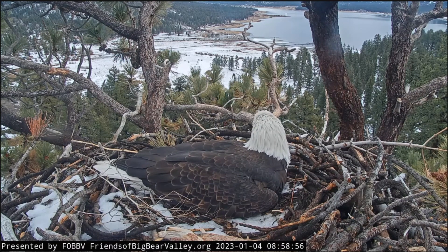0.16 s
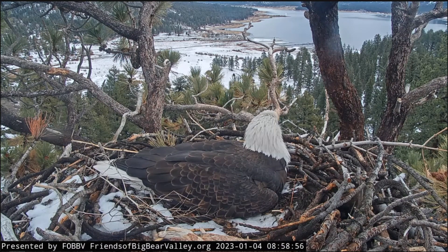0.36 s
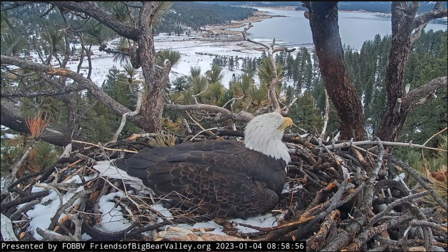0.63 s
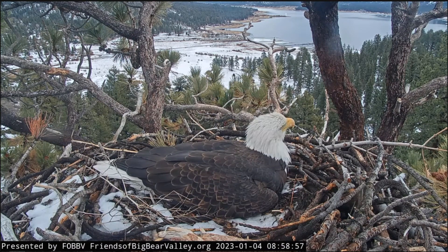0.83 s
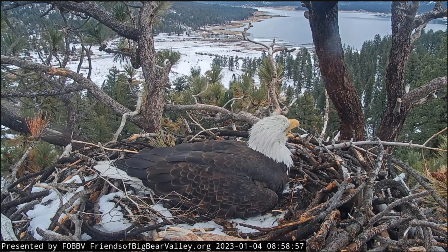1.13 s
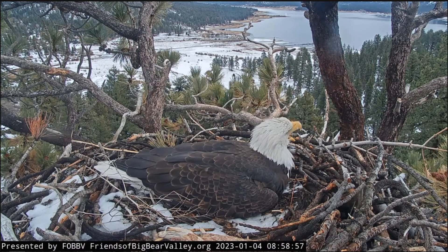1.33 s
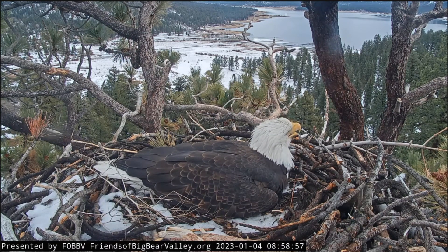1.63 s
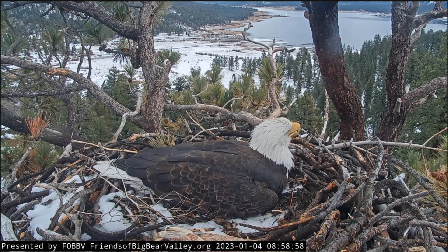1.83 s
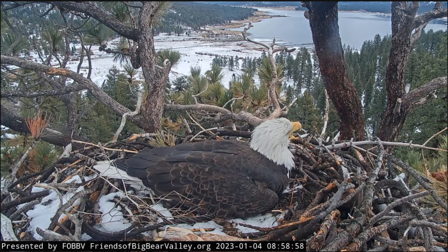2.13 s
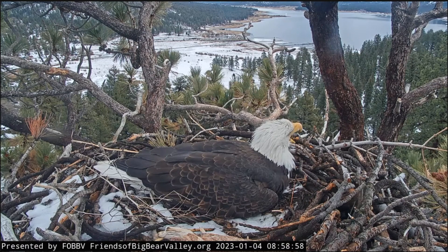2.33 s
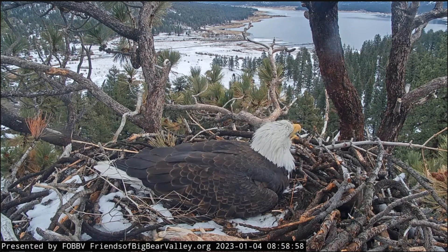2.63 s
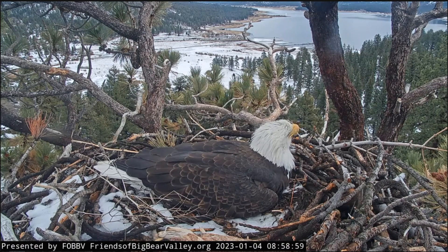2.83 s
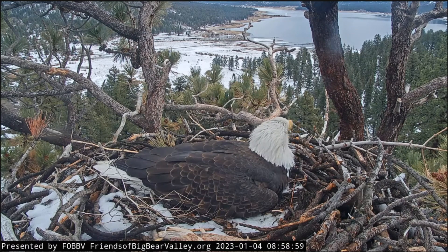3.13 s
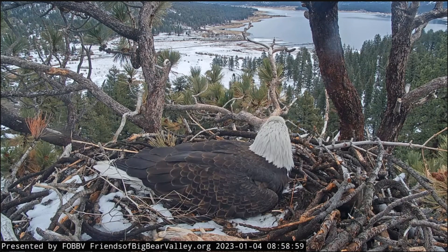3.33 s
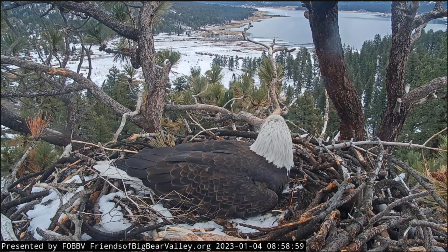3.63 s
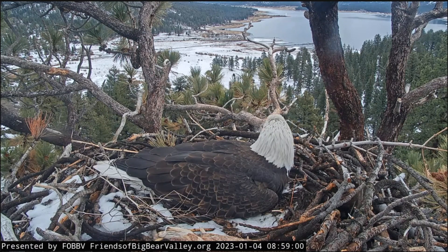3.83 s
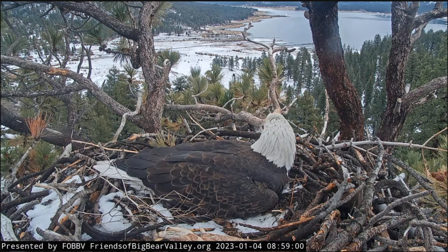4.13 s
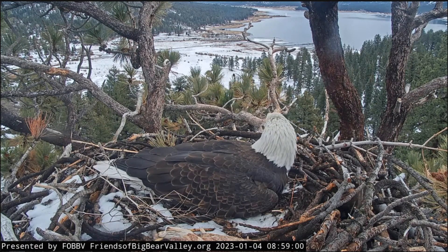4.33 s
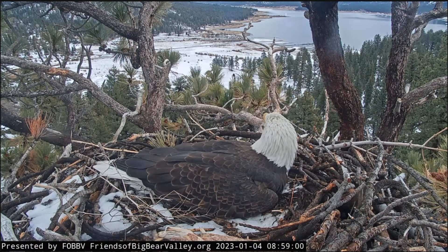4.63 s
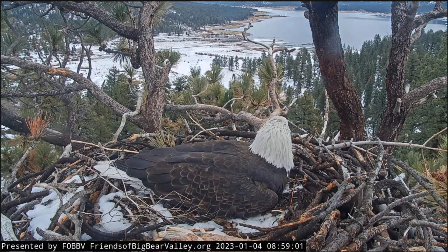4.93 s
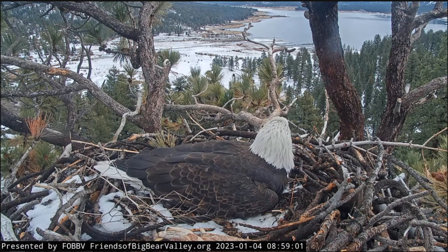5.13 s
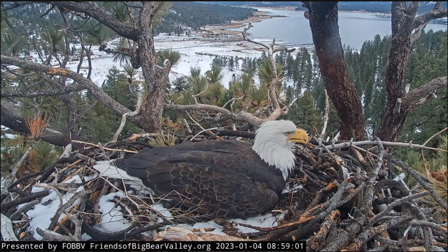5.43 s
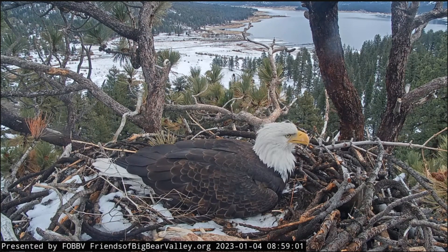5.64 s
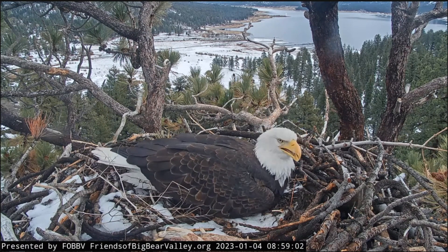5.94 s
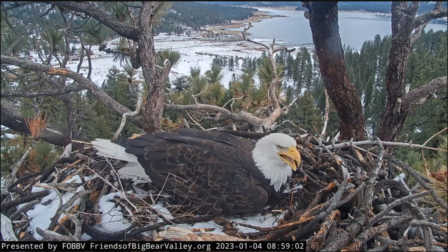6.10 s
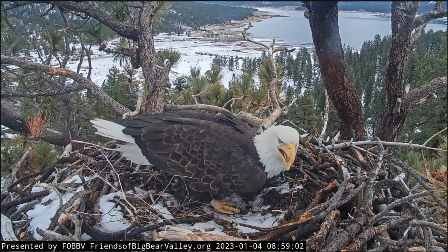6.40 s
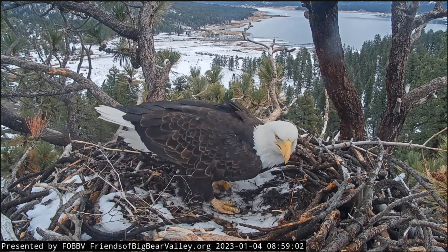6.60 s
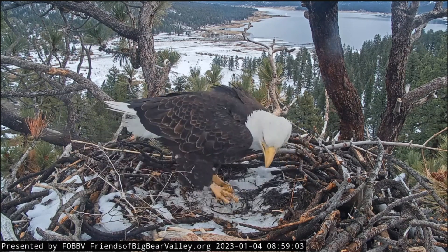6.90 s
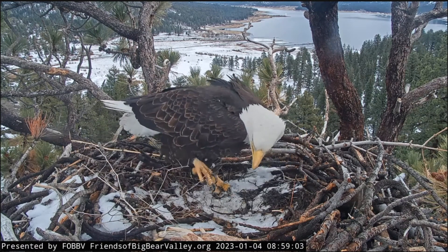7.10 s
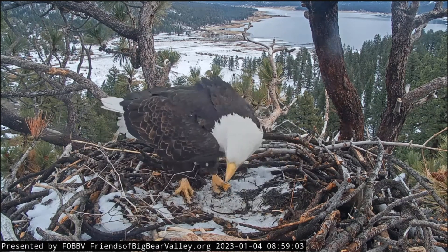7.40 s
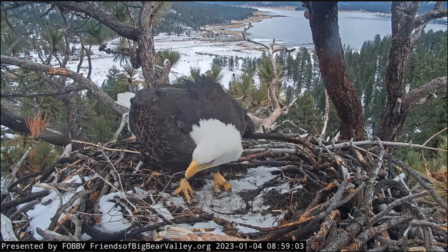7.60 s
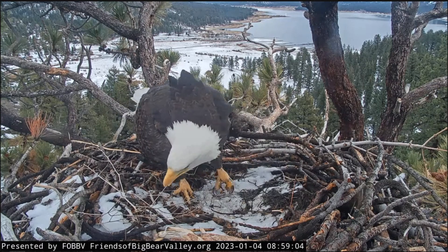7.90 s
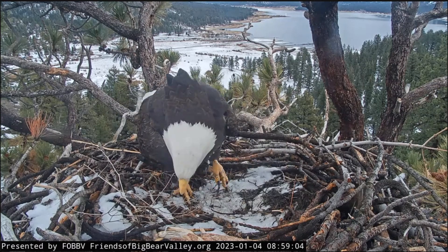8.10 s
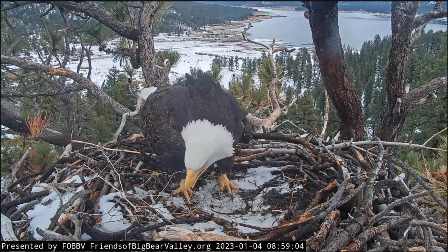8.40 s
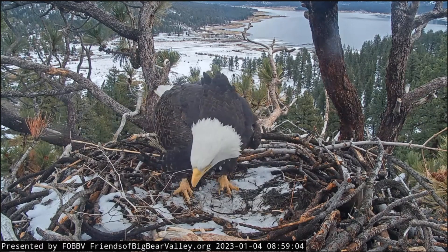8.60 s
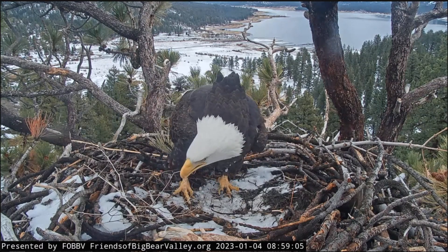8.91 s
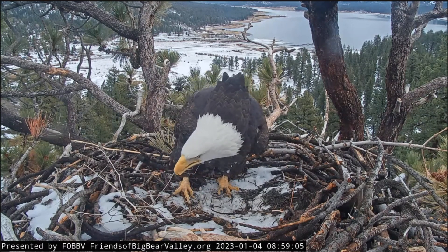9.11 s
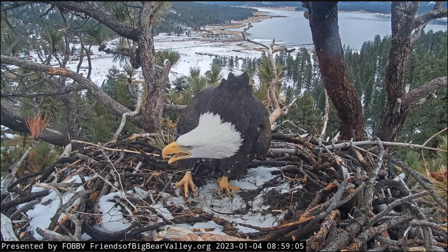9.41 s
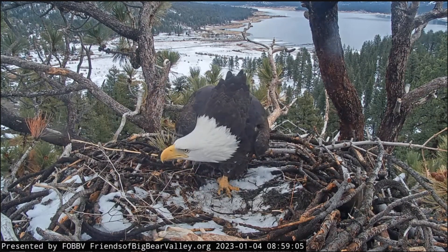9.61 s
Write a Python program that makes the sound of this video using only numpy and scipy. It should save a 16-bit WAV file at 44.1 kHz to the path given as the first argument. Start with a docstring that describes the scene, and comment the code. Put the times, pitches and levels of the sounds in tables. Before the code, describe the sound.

A bald eagle close by gives two long, rising, slightly raspy squeals, pauses, then gives five more over a low rumble and soft hiss.

```python
"""A low rumble and a soft hiss run throughout. After a second, a bald eagle on its nest gives two long,
rising squeals; the background dips under the second, with a dull bump. After a pause come five more,
while twigs tick. Trees faintly echo each one. The first, fifth and last jump from a low voice to a high
one. The bird's voice box (syrinx) has two sides; when both vibrate at once, the squeal turns raspy."""
import sys
import numpy as np
from scipy import signal
from scipy.fft import rfft, irfft, next_fast_len
from scipy.io import wavfile
from scipy.ndimage import map_coordinates

SR = 44100
rng = np.random.default_rng(int(sys.argv[2]) if len(sys.argv) > 2 else 0)


def generate_wav(signal):
    """Clip the signal to [-1, 1] and save it as 16-bit WAV at the path in sys.argv[1]."""
    frames = np.transpose(np.atleast_2d(signal))
    scaled = np.clip(frames, -1, 1) * 32767
    pcm = np.round(scaled).astype(np.int16)
    wavfile.write(sys.argv[1], SR, pcm)


N = 429975

# One row per note; a squeal that jumps up is a low note running straight into a high one.
# first_hz, last_hz, arch_hz, fall_s, opening_rasp (0-1), shrill_from_db (effort that turns it shrill),
# then added to the effort: ends_db, middle_db (both for harmonic 1), beside_db (see harmonic_levels)
NOTE_SHAPES = [ (1053.5, 1151, 2, 0, 0.29, -17.5, -8.5, -16, -5),
               (1630.4, 1703, 0.5, .036, 0.11, -18.5, -13, -14, -15.5),
               (1644.6, 1799, 11.5, .04, 0.9, -18.5, -6.5, -15, -15),
               (1533, 1694, 23.5, .025, .03, -18.5, -5.5, -12, -10),
               (1530, 1722, 33.5, .042, 0.85, -19, -3.5, -7.5, -9.5),
               (1119.7, 1260, 3.5, 0.0025, 0.087, -22, -7.5, -1.5, -7.5),
               (1780, 1830, 10.5, .055, 0.3, -17, -10.5, -19, -12.5),
               (1138.6, 1265, 44, 0.053, 0.051, -20, -6, -6, -3.5),
               (1118.5, 1191, -21.5, 0.0045, 0.16, -19, -9.5, -5, -4),
               (1714, 1702, -41, .069, 0.3, -19, -6.5, -4.5, -19.5), ]
# How hard the bird pushes, and the level of the harmonic its throat boosts.
# One list per note, from start to end: time_s, effort_db, throat_db
NOTE_EFFORTS = [
    [(1.005, -28.5, -43), (1.017, -26, -34), (1.099, -17.5, -22), (1.119, -21, -35), (1.145, -14.5, -19.5),
     (1.211, -22.5, -31), (1.225, -20.5, -15)],
    [(1.218, -19, -25), (1.234, -14.5, -15), (1.424, -13, -14), (1.456, -13.5, -15), (1.476, -32.5, -37.5)],
    [(2.13, -22, -27), (2.164, -15, -16.5), (2.4, -12.5, -13), (2.524, -13.5, -13.5), (2.59, -8, -16),
     (2.602, -16, -23.5), (2.614, -7.5, -15.5), (2.652, -12.5, -14.5), (2.668, -31.5, -33)],
    [(4.752, -31, -29), (4.782, -27.5, -24), (4.878, -25.5, -20.5), (4.964, -27.5, -39.5),
     (5.02, -23, -21.5), (5.128, -24, -26), (5.17, -19.5, -20), (5.318, -13.5, -17), (5.338, -37.5, -33)],
    [(5.872, -21.5, -37), (5.882, -23.5, -28.5), (5.95, -21, -22.5), (6.022, -17.5, -32.5),
     (6.08, -15.5, -22), (6.116, -17, -28), (6.178, -13, -16), (6.554, -12, -14.5), (6.575, -32, -33)],
    [(6.935, -21.5, -28.5), (6.949, -17, -17), (6.999, -17.5, -27), (7.101, -17.5, -15), (7.149, -18, -24),
     (7.301, -18.5, -25.5), (7.349, -17.5, -15.5), (7.451, -16.5, -22.5), (7.474, -14, -17)],
    [(7.472, -12, -18.5), (7.486, -11, -11), (7.518, -10.5, -13), (7.543, -21.5, -32.5)],
    [(7.927, -23, -33.5), (7.961, -20, -20.5), (8.115, -20, -26), (8.191, -17.5, -19.5), (8.367, -14, -32),
     (8.449, -15.5, -25.5), (8.497, -15, -27), (8.519, -16.5, -20), (8.542, -31, -37)],
    [(8.974, -24.5, -42), (8.984, -18, -28), (9.066, -22.5, -37), (9.152, -23, -28.5),
     (9.262, -19.5, -29.5), (9.342, -21.5, -36.5), (9.41, -18, -19), (9.436, -34, -30.5)],
    [(9.43, -25.5, -24.5), (9.462, -15.5, -18.5), (9.504, -15, -20), (9.572, -17, -19), (9.598, -30, -39)],
]


def amp(db):
    """Turn decibels into a gain."""
    return 10 ** (np.asarray(db) / 20)


def along(points, hz):
    """Read a curve of (hz, value) points, joined on a log frequency axis."""
    freqs, values = np.transpose(points)
    return np.interp(np.log(hz + 1), np.log(freqs), values)


def wobble(rate, size):
    """A smooth random curve through `rate` new values a second."""
    values = rng.standard_normal(int(size * rate / SR) + 4)
    return map_coordinates(values, [np.arange(size) * rate / SR])


def filtered(x, response):
    """Scale each frequency in x by response(hz)."""
    padded = next_fast_len(len(x) + 8192)
    return irfft(rfft(x, padded) * response(np.fft.rfftfreq(padded, 1 / SR)), padded)[:len(x)]


def noise(spectrum, size):
    """Noise shaped by (freq_hz, level_db) points, then scaled to an average (rms) size of 1."""
    x = filtered(rng.standard_normal(size), lambda hz: amp(along(spectrum, hz)))
    return x / np.sqrt(np.mean(x ** 2) + 1e-20)


def add(track, start_s, sound):
    """Mix a sound into the track."""
    part = track[round(start_s * SR):][:len(sound)]
    part += sound[:len(part)]


def gate(t, start, end, ramp):
    """1 between start and end, with soft edges centred on them."""
    return np.sin(np.pi / 2 * np.clip(np.minimum(t - start, end - t) / ramp + .5, 0, 1)) ** 2


def arch(progress):
    """0 at both ends of a note and 1 in its middle."""
    return 4 * progress * (1 - progress)


def background():
    """A steady low rumble and soft hiss, with one dull bump."""
    # Tone of the rumble and of the hiss: freq_hz, level_db
    rumble_tone = [(12, -50.5), (20, -11.5), (48, -3.5), (65, 0.5), (123, -7), (229, -18.5), (279, -20),
                   (381, -24), (503, -23.5), (1000, -27), (1300, -59), (2200, -120)]
    hiss_tone = [(590, -29), (1000, -8), (1480, -5), (2190, -9), (2400, -6), (2850, -5.5), (3580, 0.5),
                 (5360, -14.5), (5810, -19), (6980, -22), (13000, -36), (14600, -38.5), (15600, -66.5)]
    # Both dip briefly under the second squeal: time_s, gain_db
    dip = [(2.25, 0), (2.4, -5.5), (2.5, -8.5), (2.6, 0.5)]
    t = np.arange(N) / SR
    rumble = amp(-42 + .7 * wobble(3.265, N)) * noise(rumble_tone, N)
    hiss = amp(-46 + .9 * wobble(.87, N)) * noise(hiss_tone, N)
    bump = amp(-29) * gate(t, 2.61, 2.665, .024)
    bump *= noise([(15, -11), (35, 2), (90, -8), (250, -30), (1000, -91)], N)
    return (rumble + hiss) * amp(np.interp(t, *np.transpose(dip))) + bump


def twigs():
    """Twigs in the nest tick: dry bursts of noise that fade 60 dB in 21 ms."""
    # One row per tick: start_s, relative_level_db
    ticks = [(4.5687, -50), (5.4456, -49), (5.6574, -42), (8.9536, -47), (9.2799, -33)]
    tone = [(500, -15), (3000, 17.5), (12000, -8), (15500, -13.5)]
    track, t = np.zeros(N), np.arange(SR // 20) / SR
    for start_s, level_db in ticks:
        add(track, start_s, amp(level_db + 4 - 60 * t / .021) * noise(tone, len(t)))
    return track


def forest_echo(voice, delay_s=.17, build_s=.12):
    """The wooded slope scatters back a late, dull echo that builds up and dies away."""
    # How long each frequency takes to fade by 60 dB: freq_hz, fade_s
    fade_times = [(500, 0.28), (3400, 1), (12000, 0.1)]
    hz, t, spectrum = signal.stft(rng.standard_normal(SR), SR, nperseg=256)
    fade = amp(-60 * t / along(fade_times, hz)[:, None])
    tail = signal.istft(spectrum * fade, SR, nperseg=256)[1]
    tail *= np.minimum(np.arange(len(tail)) / SR / build_s, 1)
    echo = np.zeros(N)
    add(echo, delay_s, signal.fftconvolve(voice, tail / np.linalg.norm(tail)))
    tone = [(1700, -5.5), (3500, -1.5), (6000, -21), (12000, -29)]
    return filtered(echo, lambda hz: amp(along(tone, hz)))


def trunk_echoes(voice):
    """Trunks around the nest bounce back quick, weak copies that beat with the falling note ends."""
    echoes = np.zeros(N)
    for delay_s, db in [(.009, -29.5), (.017, -25)]:
        add(echoes, delay_s, amp(db) * voice)
    return filtered(echoes, lambda hz: amp(along([(4000, 4.5), (12000, -7.5)], hz)))


def hoarseness(t, lead_s=.014, hold_s=.028):
    """How much the other side of the voice box joins in: as each note opens, and in uneven patches."""
    # Hoarse stretches inside the notes: start_s, end_s, relative_depth (0-1)
    stretches = [(5.218, 5.314, 0.02), (7.192, 7.225, .13), (7.272, 7.3, .15), (7.311, 7.47, .04),
                 (8.03, 8.248, .055), (8.27, 8.505, 0.02), (9.252, 9.336, 0.04), (9.464, 9.545, 0.36)]
    starts = [effort[0][0] for effort in NOTE_EFFORTS]
    openings = sum(depth * gate(t, start - lead_s, start + hold_s, .014)
                   for (_, _, _, _, depth, *_), start in zip(NOTE_SHAPES, starts))
    patches = sum(depth * gate(t, start, end, .022) for start, end, depth in stretches)
    return openings + patches * amp(3.5 * wobble(37.4, len(t)))


def breath(shrill_db, rasp):
    """Air rushes through the open beak, louder when the voice is shrill or raspy."""
    # Tone of the rushing air: freq_hz, level_db
    air_tone = [(300, -42.5), (900, -24.5), (2200, -12.5), (3200, -28.5), (5000, -1), (8500, 1.5),
                (13000, -4.5), (15500, -36)]
    return amp(shrill_db - 26) * (1 + 2 * rasp) * noise(air_tone, len(rasp))


def growl(level_db, rasp):
    """Uneven vibration makes the throat ring with a narrow band of noise."""
    throat_tone = [(2200, -39), (2800, -16.5), (3000, -3.5), (3400, -1.5), (4200, -10), (5200, -30)]
    return amp(level_db) * np.clip(rasp + .069, 0, .25) * noise(throat_tone, len(rasp))


def glide(age, progress, first_hz, last_hz, arch_hz, scoop, settle_s=.07, swing_hz=13.5):
    """A note's curved pitch path; with a scoop it starts too low, overshoots and settles."""
    path_hz = first_hz + (last_hz - first_hz) * progress + arch_hz * arch(progress)
    return path_hz * (1 - scoop * np.exp(-(age / settle_s) ** 2) * np.cos(2 * np.pi * swing_hz * age))


def harmonic_levels(effort_db, throat_db, colour, low, progress, falling, unsteady):
    """Levels of harmonics 1-3 and of the shrill overtones, which flare up when the bird pushes hard."""
    shrill_from_db, ends_db, middle_db, beside_db = colour
    size = len(progress)
    late_arch = arch(progress ** 1.4)  # peaks after the middle of the note
    first = effort_db + ends_db + (middle_db - ends_db) * late_arch + .3 * wobble(8.2, size)
    beside = effort_db + beside_db + .3 * wobble(8.2, size)
    trembling_db = effort_db + .73 * wobble(80, size)
    forced = np.clip((trembling_db - shrill_from_db) / 6, 0, 1)  # 0 soft, 1 forced
    shrill = effort_db - 26.5 + 22 * forced - 5 * falling
    # the throat boosts harmonic 3 of a low note and 2 of a high one; the other lies beside it
    second, third = (beside, throat_db) if low else (throat_db, beside)
    return [db + 2.5 * unsteady * wobble(90, size) for db in (first, second, third, shrill)]


def overtones(t, phase, pitch, shrill_db, shrill_tone, top_harmonic, converter_hz=32000):
    """The shrill harmonics from the fourth up; they grow duller as the effort drops."""
    k = np.arange(4, top_harmonic + 1)[:, None]
    hz = k * pitch
    db_per_octave = np.minimum(shrill_db + 16.5, 0)
    flutter_db = np.array([.65 * wobble(9.88, len(t)) + 1.6 * wobble(70, len(t)) for _ in k])
    gains = amp(along(shrill_tone, hz) + db_per_octave * np.log2(k) + flutter_db)
    treble = hz.mean(axis=1) > 5300
    gains /= np.linalg.norm(gains[treble], axis=0)
    # overtones above half the digital converter's rate fold back down and glide the opposite way
    angle = np.where(hz > converter_hz / 2, 2 * np.pi * converter_hz * t - k * phase, k * phase)
    return amp(shrill_db) * np.sum(gains * np.sin(angle), axis=0)


def two_sides(pitch, rasp, other_ratio, other_drift, pull, chaos):
    """The two sides of the voice box beat together, shaking the wave's phase and level into a rasp."""
    size = len(pitch)
    phase = 2 * np.pi * np.cumsum(pitch) / SR
    other_hz = pitch * other_ratio * (1 + other_drift * wobble(400, size))
    other = 2 * np.pi * np.cumsum(other_hz) / SR
    beat = other - phase
    shake = pull * (np.sin(beat) - .24 * np.sin(other)) + chaos * wobble(1300, size)
    swell = 1 + rasp * (.43 * np.cos(beat) + .22 * np.cos(other))
    return phase + rasp * shake, swell


def squeal_note(note, effort, scoop, low, shrill_tone, top_harmonic, growl_db, shimmer_db, **sides):
    """The voice box whistles one gliding note, with breath and growl. Returns start time and sound."""
    first_hz, last_hz, arch_hz, fall_s, _, *colour = note
    times, *levels = np.transpose(effort)
    start, end = times[0], times[-1]
    t = np.arange(start - .01, end + .01, 1 / SR)
    size = len(t)
    age, left = t - start, np.maximum(end - t, 0)
    progress = np.clip(age / (end - start), 0, 1)
    falling = (np.maximum(fall_s - left, 0) / (fall_s + 1e-9)) ** 2  # rises to 1 as the note ends
    pitch = glide(age, progress, first_hz, last_hz, arch_hz, scoop) * (1 - .15 * falling)
    unsteady = np.exp(-np.minimum(age, left) / .11)  # while the voice settles, and as it tires
    effort_db, throat_db = [np.interp(t, times, db) for db in levels]
    *main_db, shrill_db = harmonic_levels(effort_db, throat_db, colour, low, progress, falling, unsteady)
    # as the air pressure gives out, the voice cracks: pitch and level shake for the last 25 ms
    gives_out = fall_s > .005  # a note that jumps up keeps its pressure
    crack = gives_out * np.clip(1 - left / .025, 0, 1)
    pitch *= 1 + (.001 + .0075 * crack) * wobble(140, size) + .0021 * wobble(900, size)
    rasp = hoarseness(t) + .36 * crack ** 2
    phase, swell = two_sides(pitch, rasp, **sides)
    swell *= amp((shimmer_db + 3.3 * crack) * wobble(129.9, size))
    # the three lowest harmonics carry the note; a weak one flickers more than a strong one
    flicker_db = np.clip(.071 * (-23 - np.array(main_db)), .2, 2)
    body = sum(amp(db + depth * wobble(70, size)) * np.sin(k * phase)
               for k, (db, depth) in enumerate(zip(main_db, flicker_db), 1))
    shrill = overtones(t, phase, pitch, shrill_db, shrill_tone, top_harmonic)
    whistle = np.sqrt(2) * swell * (body + shrill)
    sound = whistle + breath(shrill_db, rasp) + growl(np.max(main_db, axis=0) + growl_db, rasp)
    return t[0], sound * gate(t, start, end, ramp=.015)


def eagle(high_from_hz=1400, grunt_lead_s=.027):
    """The eagle calls in its low and high voice; each squeal opens with a soft grunt and a scoop."""
    # Tone of the shrill overtones at full effort, for each voice: freq_hz, level_db
    low_tone = [(4800, -2), (6300, 7), (7500, 6.5), (8800, 6.5), (10200, 2), (12600, -1), (14000, -8.5),
                (15400, -26)]
    high_tone = [(6700, -7), (8500, 1.5), (10400, -0.5), (12000, -7), (13700, -13), (15400, -30),
                 (19000, -28.5), (22000, -26.5), (27000, -39.5)]
    low_voice = dict(shrill_tone=low_tone, top_harmonic=12, growl_db=-7, shimmer_db=-.1,
                     other_ratio=1.47, other_drift=.025, pull=.96, chaos=.14)
    high_voice = dict(shrill_tone=high_tone, top_harmonic=16, growl_db=-21, shimmer_db=.4,
                      other_ratio=.688, other_drift=.003, pull=.61, chaos=.05)
    track, t = np.zeros(N), np.arange(SR // 25) / SR
    grunt = np.hanning(len(t)) * np.sin(2 * np.pi * (430 + 1200 * t) * t)
    last_end = 0
    for note, effort in zip(NOTE_SHAPES, NOTE_EFFORTS):
        start, first_db, _ = effort[0]
        from_silence = start - last_end > .1
        scoop = .021 * from_silence  # share of the pitch
        low = note[0] < high_from_hz
        add(track, *squeal_note(note, effort, scoop, low, **(low_voice if low else high_voice)))
        if from_silence:
            add(track, start - grunt_lead_s, amp(first_db - 20) * grunt)
        last_end = effort[-1][0]
    return track


def scene():
    """The eagle close by, with the trees and the background around it, in mono."""
    voice = eagle()
    return (voice + trunk_echoes(voice) + amp(-37.3) * forest_echo(voice) + twigs() + background())[None]


def record(dry):
    """The microphone input rounds off the highest peaks and cuts the very top of the treble."""
    ceiling, top_hz = .78, 15780
    rounded = dry / (1 + (dry / ceiling) ** 8) ** (1 / 8)
    return np.array([filtered(channel, lambda hz: hz < top_hz) for channel in rounded])


dry = scene()
out = record(dry)
generate_wav(out)
```